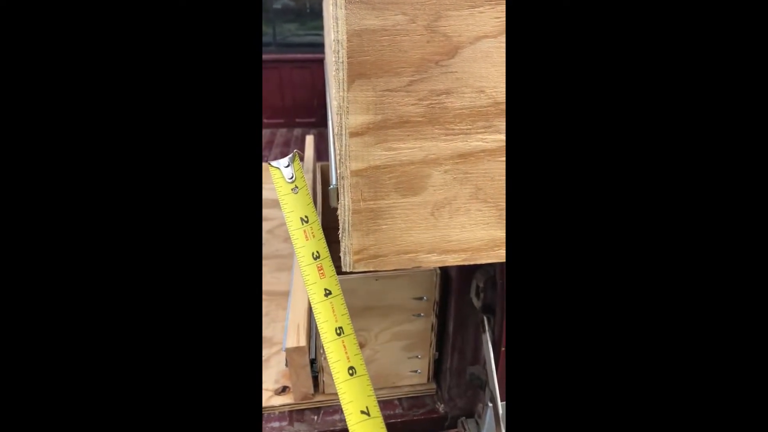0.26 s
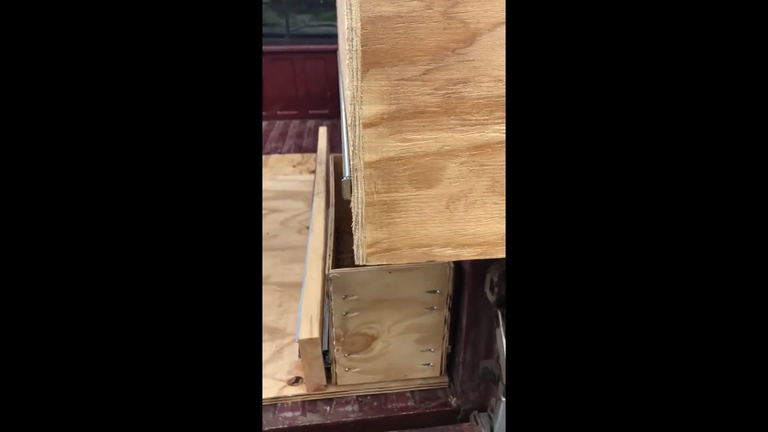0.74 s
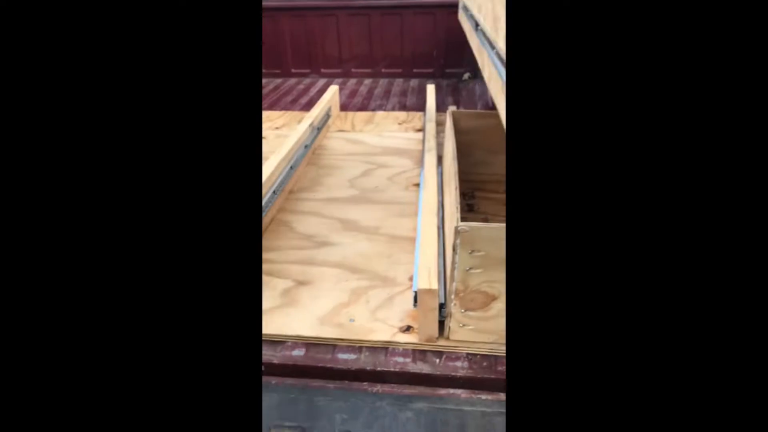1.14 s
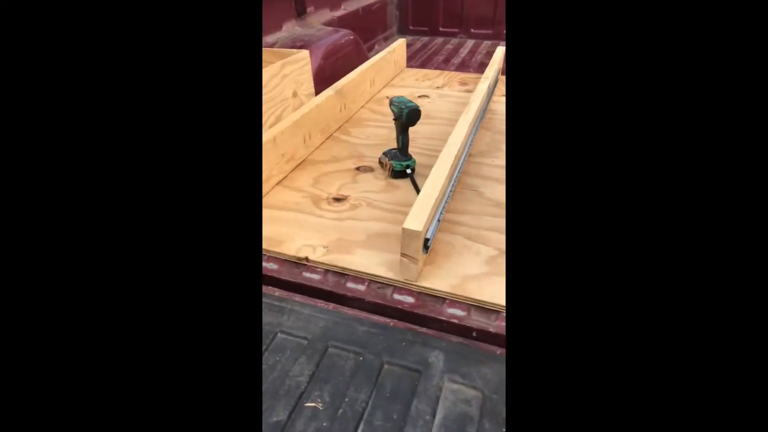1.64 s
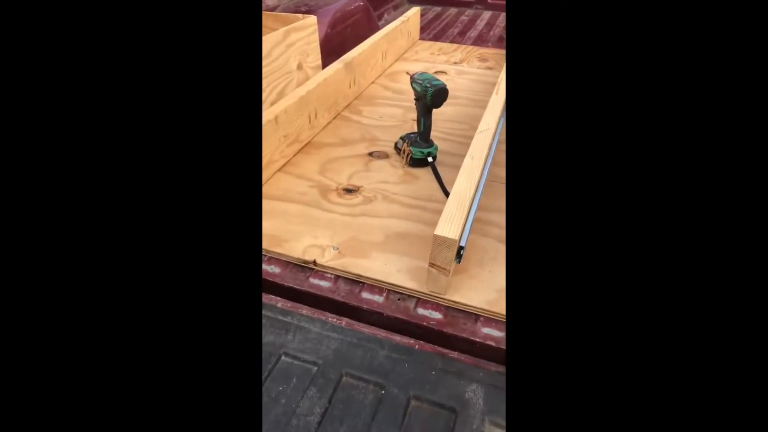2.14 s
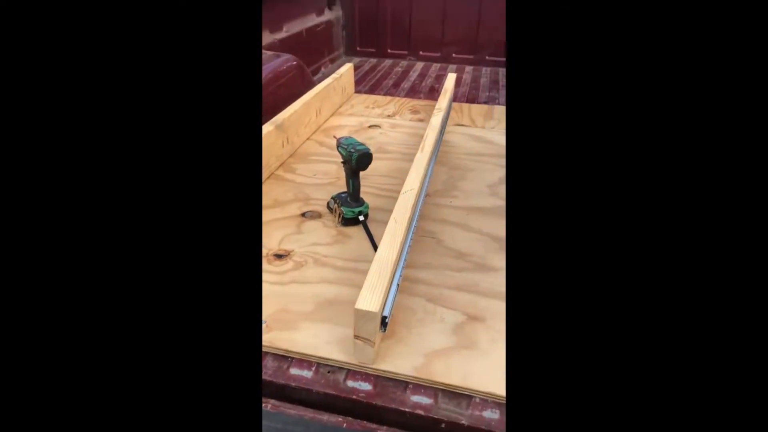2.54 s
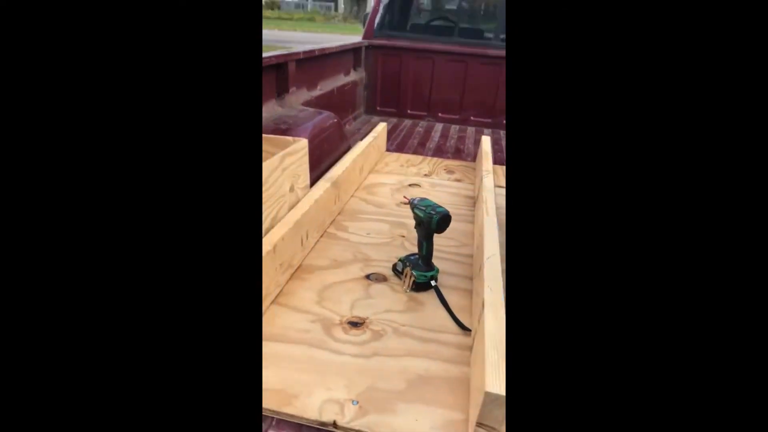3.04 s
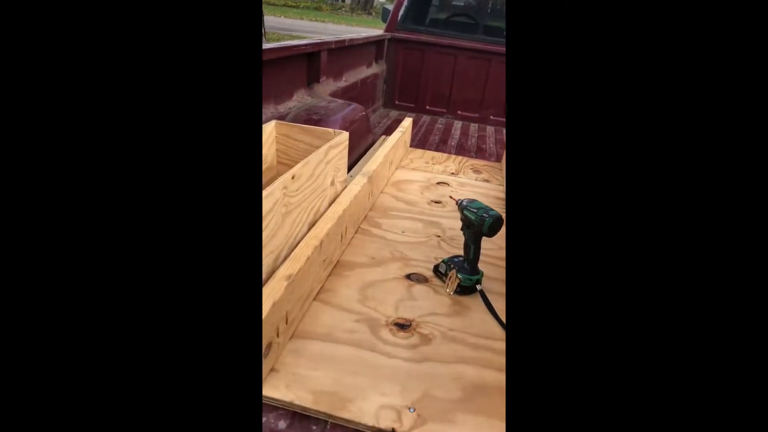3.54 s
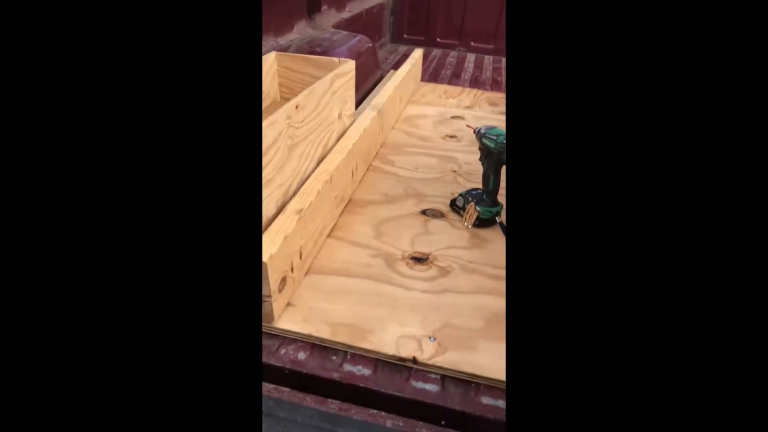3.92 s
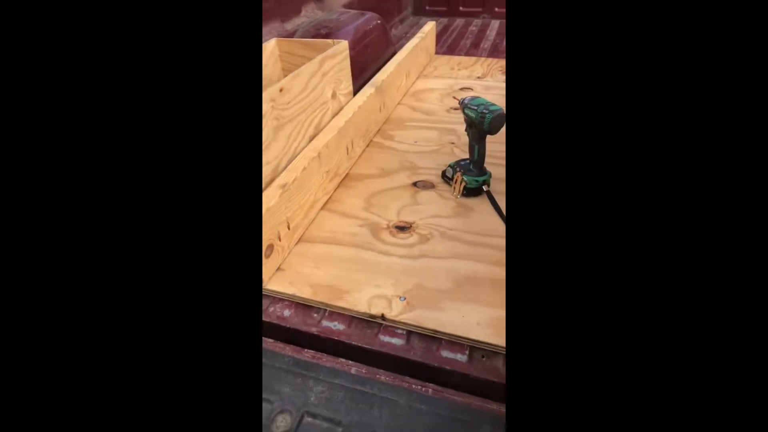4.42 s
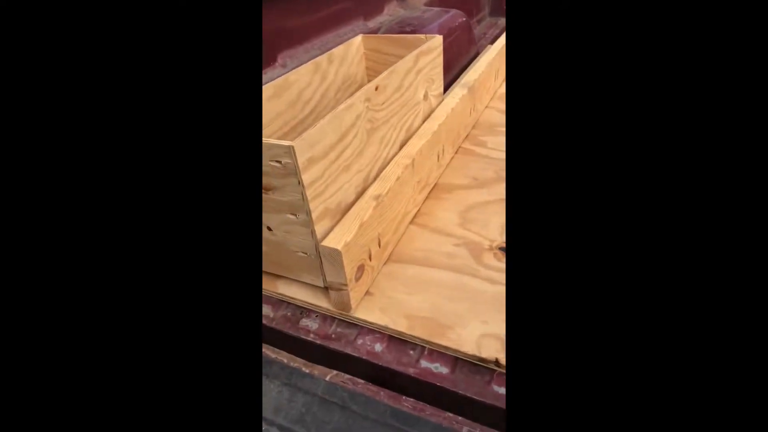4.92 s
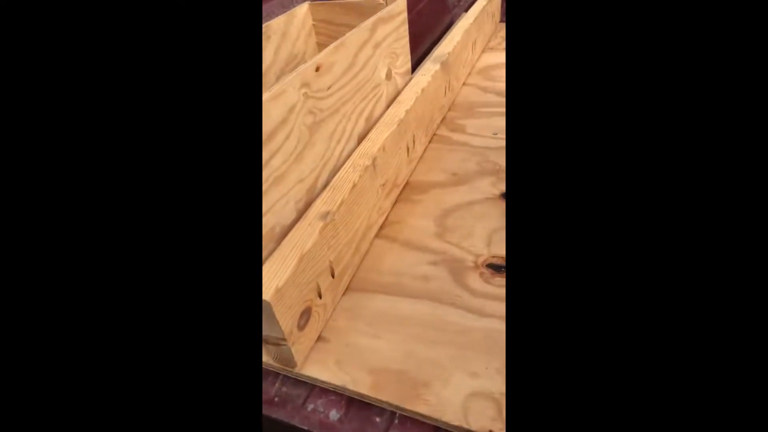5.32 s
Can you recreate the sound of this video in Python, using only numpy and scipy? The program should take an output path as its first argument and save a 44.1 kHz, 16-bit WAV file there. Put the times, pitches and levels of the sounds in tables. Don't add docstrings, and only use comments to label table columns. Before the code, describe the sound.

Close to a phone at an open truck bed, a tape measure ticks, zips into its case and snaps. A plywood drawer then drops and rattles, is dragged with scraping and low booms, and is shoved in a dense run of hard knocks. It settles quickly, leaving faint distant traffic and a few tiny nudges.

```python
import sys
import numpy as np
from scipy import signal
from scipy.fft import rfft, irfft, next_fast_len
from scipy.io import wavfile
from scipy.ndimage import uniform_filter1d, minimum_filter1d, map_coordinates

SR = 44100
rng = np.random.default_rng(int(sys.argv[2]) if len(sys.argv) > 2 else 0)


def linear_from_db(decibels):
    return 10 ** (np.asarray(decibels, float) / 20)


def generate_wav(sig):
    pcm = np.round(np.clip(np.atleast_2d(sig).T, -1, 1) * 32767).astype(np.int16)
    wavfile.write(sys.argv[1], SR, pcm)


N = 245833

# (frequency [Hz], width [Hz], level [dB])
BED = [(135.3, 13, -1), (149, 22.3, -1), (191.5, 23.3, 1.5), (246.8, 20.2, -4), (308, 27.6, -7)]
# (frequency [Hz], width [Hz], level [dB])
PLY = [(329.4, 46.6, -1.5), (442, 84, -1), (472, 106, -2), (612, 98, -8), (725, 122, -11),
       (996, 213, -10.5), (1084, 307, -13.5), (1794, 390, -26)]
# (frequency [Hz], width [Hz], level [dB])
HOLLOW = [(195, 20, -11.5), (249, 56, -16.5), (332, 62, -6.5), (355, 35, 0.5), (382.2, 38, -1),
          (430, 34, -4.5), (507, 91, -12.5), (651, 45, -16), (715, 73, -18), (957, 170, -22),
          (1158, 440, -24), (1570, 71, -20.5)]
# (start [s], end [s])
LYING = (2.6, 5.0)
# (crack treble [dB], crack centre [Hz], floor over pressure [dB], frame over pressure [dB],
# extra truck growth with pressure [dB/dB])
GESTURES = [
    (-25.5, 2200, -2.5, -11, -0.44),
    (-24.5, 1100, 14.5, 3.5, 0.16),
    (-15.5, 2500, 4.5, 1.5, -0.25),
    (-29, 3130, 6.5, 8, -0.23),
    (-31, 2100, 4.5, -7, -0.17),
]


def unit(x):
    return x / np.sqrt(np.mean(x ** 2) + 1e-20)


def along(points, hz):
    f, v = np.transpose(points)
    return np.interp(np.log(hz + 1), np.log(f + 1), v)


def gains(rows):
    s, *cols = np.transpose(rows)
    return [linear_from_db(np.interp(np.arange(N) / SR, s, c, left=-120, right=-120)) for c in cols]


def strokes(starts_s, ends_s, levels_db, rises, falls):
    grid_s = np.arange(0, N / SR + .002, .001)
    columns = (starts_s, ends_s, levels_db, rises, falls)
    start, end, db, up, down = (np.reshape(v, (-1, 1)) for v in columns)
    before_db = abs(up) * np.maximum(start - grid_s, 0)
    after_db = abs(down) * np.maximum(grid_s - end, 0)
    gain = linear_from_db(db - before_db - after_db).sum(axis=0)
    return np.interp(np.arange(N) / SR, grid_s, gain)


def wobble(rate_hz):
    knots = rng.standard_normal(int(N * rate_hz / SR) + 4)
    return map_coordinates(knots, [np.arange(N) * rate_hz / SR])


def filtered(x, response):
    m = next_fast_len(N + SR // 8)
    return irfft(rfft(x, m) * response(np.fft.rfftfreq(m, 1 / SR)), m)[:N]


def coloured(x, spectrum):
    return unit(filtered(x, lambda hz: linear_from_db(along(spectrum, hz))))


def patchy(x, depth_db):
    z = signal.stft(x, nperseg=256)[2]
    field = uniform_filter1d(rng.standard_normal(z.shape), size=4, axis=0)
    field = uniform_filter1d(field, size=8, axis=1)
    return signal.istft(z * linear_from_db(depth_db * unit(field)), nperseg=256)[1][:N]


def grit(share, spread_db):
    catches = (rng.random(N) < share) * linear_from_db(spread_db * np.minimum(rng.exponential(1, N), 3))
    return rng.standard_normal(N) * (1 + catches)


def resonance(f, centre_hz, width_hz):
    return 1j * f * width_hz / (centre_hz * centre_hz - f * f + 1j * f * width_hz)


def radiation_loss(f, top_hz):
    return 1 + 1.4j * f / top_hz - (f / top_hz) ** 2


def ring(x, modes, top_hz):
    def body(f):
        total = sum((-1) ** k * linear_from_db(db) * resonance(f, c, w) for k, (c, w, db) in enumerate(modes))
        return total / radiation_loss(f, top_hz)
    return filtered(x, body)


def bursts(times, levels_db, t60s, noise):
    out, t = np.zeros(N + SR), np.arange(noise.shape[1]) / SR
    for s, db, t60, row in zip(times, levels_db, t60s, noise):
        out[round(s * SR):][:len(t)] += linear_from_db(db - 60 * t / max(t60, .003)) * row
    return out[:N]


def cracks(times, peaks_db, treble_db, centres_hz, t60s, low_hz, knee_hz, steep, lift, sharp):
    hz = np.fft.rfftfreq(4096, 1 / SR)
    centre, treble = np.asarray(centres_hz)[:, None], np.asarray(treble_db)[:, None]
    octaves = np.log2(np.maximum(hz, knee_hz) / knee_hz)
    slope = linear_from_db((treble + 4) * steep * octaves) / np.hypot(1, (hz / 11000) ** 2)
    peak = 1 + lift / (1 + ((hz - centre) / (.1 * centre)) ** 2)
    shape = (hz / np.hypot(hz, low_hz)) ** 2 * slope * peak
    mottle = linear_from_db(1.3 * unit(uniform_filter1d(rng.standard_normal(shape.shape), size=40)))
    rows = irfft(rfft(rng.standard_normal((len(times), 4096))) * shape * mottle)
    rows = rows / rows.std(axis=1, keepdims=True)
    t = np.arange(4096) / SR
    rise_s = 0.00034 + 0.02 * np.asarray(t60s)[:, None]
    envelope = (1 - np.exp(-t / rise_s)) * (1 + sharp * np.exp(-t / 0.0036))
    return bursts(times, peaks_db, t60s, rows * envelope)


def blows(times, levels_db, contact_s, rough, chatter_s=0.039):
    u = np.arange(1024) / (contact_s * SR)
    push = u * np.exp(-u) / (contact_s * SR) + rough * rng.standard_normal((len(times), 1024))
    return bursts(times, levels_db, np.full(len(times), chatter_s), push)


def struck(times, levels_db, modes, top_hz, contact_s, rough, chatter_s, own_hz=None):
    mode_scatter_db, pitch_scatter = 1.5, .015
    n, f = np.arange(4096), np.fft.rfftfreq(4096, 1 / SR)
    u = n / (contact_s * SR)
    chance = rng.standard_normal((len(times), 2, len(modes)))
    chatter = rough * linear_from_db(-60 * n / SR / chatter_s) * rng.standard_normal((len(times), len(n)))
    push = u * np.exp(-u) / (contact_s * SR) + chatter
    body = 0
    for k, (centre_hz, width_hz, db) in enumerate(modes):
        gain = (-1) ** k * linear_from_db(db + mode_scatter_db * chance[:, :1, k])
        pitch_hz = centre_hz * (1 + pitch_scatter * chance[:, 1:, k])
        body = body + gain * resonance(f, pitch_hz, width_hz)
    if own_hz is not None:
        body = body + resonance(f, own_hz[:, None], 0.21 * own_hz[:, None])
    rows = irfft(rfft(push) * body / radiation_loss(f, top_hz))
    return bursts(times, levels_db, np.full(len(times), 10), rows)


def is_lying(t):
    return (t > LYING[0]) & (t < LYING[1])


def traffic():
    # (frequency [Hz], level [dB])
    hum_spectrum = [(13, -55), (22, -33), (43, -16.5), (60, 0.5), (81, -1), (133, -7.5), (171, -7),
                    (306, -18), (371, -22.5), (784, -21.5), (1120, -23), (2370, -34.5), (16500, -60)]
    return linear_from_db(-54 + 0.45 * wobble(0.6)) * coloured(rng.standard_normal(N), hum_spectrum)


def tape():
    # (frequency [Hz], level [dB])
    rasp_spectrum = [(180, -42.5), (300, -10), (610, -16), (1770, -7.5), (2560, -2.5), (4070, -9),
                     (6080, -6.5), (12000, -23), (15600, -61), (22000, -120)]
    hiss_spectrum = [(1180, -43), (2000, -28), (3400, -6), (5620, -2), (9050, -4), (15000, -9.5),
                     (16100, -2.5), (16500, -47.5)]
    # (frequency [Hz], width [Hz], level [dB])
    blade_modes = [(3387, 280, 3.5), (5700, 200, -1.5), (6600, 70, -8.5), (2490, 180, -14)]
    case_modes = [(192, 130, -2.5), (337, 120, 1.5), (509, 560, 2), (900, 250, -7)]
    # (time [s], peak [dB], centre [Hz], t60 [s])
    tick_events = [(0.7747, -32.5, 4140, 0.064), (0.7864, -36.5, 7140, 0.047), (0.8634, -45, 3120, 0.14),
                   (0.8704, -34, 4080, 0.097), (0.9044, -44, 3510, .065), (0.9103, -36.5, 3480, 0.092),
                   (0.9233, -33.5, 6810, 0.0255), (1.7665, -43, 7550, 0.059), (1.8844, -39, 8370, 0.025),
                   (1.913, -47, 5700, .048)]
    # (time [s], peak [dB], case level [dB], centre [Hz], t60 [s])
    unlock_events = [
        (1.2256, -35.5, -51.5, 3070, 0.078),
        (1.2448, -21, -44.5, 6500, 0.098),
        (1.256, -23.5, -44.5, 3460, 0.092),
    ]
    slap_events = [(1.4247, -24, -64.5, 5730, 0.069), (1.4533, -19.5, -37, 5900, 0.021),
                   (1.481, -20.5, -39.5, 6150, 0.03), (1.51, -24, -42.5, 2510, 0.069),
                   (1.5377, -23.5, -49.5, 3220, 0.085)]
    snap_events = [
        (1.5957, -7.5, -39, 2480, 0.022),
        (1.608, -2, -52, 3110, 0.025),
        (1.6117, -20, -25, 2550, 0.017),
        (1.623, -17.5, -39, 3470, .078),
    ]
    group_treble_db = (-10, -3.5, -33.5, -12.5)
    # (start [s], end [s], level [dB], rise [dB/s], fall [dB/s])
    hiss_strokes = [
        (1.246, 1.49, -46.5, 750, 250),
        (1.426, 1.534, -44, 301, 328.5),
        (1.846, 1.84, -52, 153, 129.5),
    ]
    rasp_strokes = [(1.25, 1.247, -48.5, 560, 230), (1.29, 1.34, -49, 300, 301),
                    (1.44, 1.66, -40.5, 450, 493), (1.66, 1.63, -58, 300, 240), (1.8, 1.84, -56.5, 300, 70)]

    tick_case_db = -62
    groups = [np.insert(tick_events, 2, tick_case_db, axis=1), unlock_events, slap_events, snap_events]
    s, peak_db, case_db, hz, t60_s = np.vstack(groups).T
    treble_db = np.repeat(group_treble_db, [len(g) for g in groups])
    rasp_gain = strokes(*np.transpose(rasp_strokes)) * linear_from_db(-4 + 2.0 * wobble(59.65))
    hiss_gain = strokes(*np.transpose(hiss_strokes)) * linear_from_db(0.5 + 2.1 * wobble(50))
    sliding = rasp_gain * coloured(patchy(grit(0.007, 1.1), 2.1), rasp_spectrum)
    sliding = sliding + hiss_gain * coloured(patchy(grit(.01, 2.5), 1.8), hiss_spectrum)
    clicks = cracks(s, peak_db - 10.5, treble_db, hz, t60_s, low_hz=0.5 * hz[:, None],
                    knee_hz=6300, steep=1.0, lift=0.66, sharp=1.4)
    steel = linear_from_db(-3.5) * ring(clicks + 0.44 * sliding, blade_modes, top_hz=12000)
    case = ring(blows(s, case_db + 35.0, .0001, 0.021), case_modes, top_hz=2500)
    return sliding + clicks + steel + case


def walls(x):
    # (frequency [Hz], t60 [s])
    wall_t60 = [(200, 0.33), (2000, 0.09), (12000, 0.056)]
    hz, t, z = signal.stft(rng.standard_normal(SR // 2), SR, nperseg=256)
    decay = linear_from_db(-60 * t / along(wall_t60, hz)[:, None])
    tail = signal.istft(z * decay, SR, nperseg=256)[1]
    return signal.fftconvolve(x, tail / np.linalg.norm(tail))[:N]


def shove():
    # (time [s], pressure [dB], grit over pressure [dB])
    drag_tables = [
        [(1.95, -54, -8), (2.01, -47, 18.5), (2.12, -36.5, -14), (2.18, -33, -10), (2.34, -37, -23),
         (2.42, -43, -12), (2.46, -40.5, -3), (2.51, -35, -16), (2.56, -53.5, -8.5)],
        [(2.73, -45.5, -6), (2.82, -36.5, -17), (2.91, -33, -4.5), (2.95, -27.5, -12.5), (3.02, -29.5, -9.5),
         (3.18, -33, -12.5), (3.3, -36, -18.5), (3.37, -37.5, -13.5), (3.46, -36, -15.5), (3.5, -37, -26),
         (3.56, -42.5, -23.5)],
        [(3.6, -48, -5), (3.66, -27, -12), (3.71, -28.5, -5.5), (3.84, -38.5, -9.5), (3.92, -23.5, -14),
         (4.02, -32.5, -9), (4.1, -22, -9.5), (4.17, -35, -6.5), (4.21, -16, -13.5)],
        [(4.28, -25.5, -10), (4.36, -39.5, -7), (4.42, -43, -8), (4.48, -49.5, -11.5), (4.56, -52.5, -13),
         (4.68, -59.5, -12), (4.8, -62, -9), (5.0, -64, -3)],
        [(5.09, -61.5, 1), (5.168, -54.5, -3.5), (5.268, -60.5, -1), (5.39, -56.5, -6), (5.45, -45, -9),
         (5.54, -51, -5.5), (5.574, -35, -5.5)],
    ]
    # (time [s], floor level [dB], frame level [dB], fall [dB/s])
    lurch_events = [(1.975, -30.5, -34.5, 199), (2.019, -25, -31, 68), (2.18, -37, -51, 43),
                    (2.46, -32.5, -40.5, 78), (2.851, -16.5, -15.5, 47), (2.95, -11.5, -19, 85),
                    (3.42, -26, -47, 144), (3.474, -14.5, -44, 165), (3.628, -5.5, -22, 132),
                    (3.786, -7.5, -15, 354), (3.869, -14, -25, 323), (3.952, -10, -29.5, 248),
                    (3.98, -31, -10, 294), (4.099, -10.5, -21, 61.5), (4.169, -16, -12.5, 303.5),
                    (4.269, -13, -40.5, 153), (4.559, -45, -38.5, 153), (4.7, -41, -46, 121),
                    (5.168, -37.5, -44.5, 125), (5.311, -39, -64, 98), (5.454, -37, -58, 152),
                    (5.565, -30, -57, 108)]
    # (frequency [Hz], width [Hz], level [dB])
    frame_modes = [(55.3, 14, 0), (75, 9.9, 5), (100, 26, 3)]
    # (frequency [Hz], level [dB])
    scrape_spectrum = [(590, -20), (1000, -4), (1660, -4), (1930, -5.5), (2170, -5), (2840, -7.5),
                       (5670, -12.5), (6380, -13), (8860, -19), (15200, -27.5), (16500, -33.5)]

    mid_pressure_db, lurch_rise = -32, 550
    drag = []
    for rows, (_, _, floor_over_db, frame_over_db, grows) in zip(drag_tables, GESTURES):
        for s, pressure_db, grit_db in rows:
            truck_db = pressure_db + grows * (pressure_db - mid_pressure_db)
            drag.append((s, pressure_db, pressure_db + grit_db,
                         truck_db + floor_over_db, truck_db + frame_over_db))
    ply_gain, scrape_gain, bed_gain, frame_gain = gains(drag)
    s, floor_db, frame_db, fall = np.transpose(lurch_events)
    bed_gain = np.hypot(bed_gain, strokes(s, s, floor_db, lurch_rise, fall))
    frame_gain = np.hypot(frame_gain, strokes(s, s, frame_db, lurch_rise, fall))

    lumps = wobble(35)
    boom = unit(ring(linear_from_db(0.54 * wobble(30)) * rng.standard_normal(N), BED, top_hz=314.4))
    deep = ring(linear_from_db(0.49 * wobble(18)) * rng.standard_normal(N), frame_modes, top_hz=126.7)
    deep = unit(filtered(deep, lambda hz: (hz / np.hypot(hz, 46)) ** 3))
    drive = linear_from_db(1.8 * lumps) * grit(0.012, 1.7)
    damped = unit(ring(drive, PLY, top_hz=1450))
    free = unit(ring(drive, HOLLOW, top_hz=900))
    wood = np.where(is_lying(np.arange(N) / SR), damped, free)
    rub = linear_from_db(2.0 * lumps + 1.0 * wobble(120)) * grit(0.025, 2.6)
    rub = coloured(patchy(rub, 1.0), scrape_spectrum)
    truck = bed_gain * linear_from_db(-4.5) * boom + frame_gain * linear_from_db(0.5) * deep
    return truck + ply_gain * wood + scrape_gain * rub


def knocks():
    # (time [s], crack peak [dB], plywood level [dB], crack t60 [s])
    rock_contacts = [(1.9592, -1, -3.5, 0.025), (1.9739, 0.5, -9.5, 0.028), (1.9852, -5, -8, 0.0073),
                     (2.0034, -21.5, -20.5, 0.088), (2.0134, -22.5, -18, 0.13), (2.0264, -22, -3, 0.019),
                     (2.0385, -17.5, -34, 0.0093), (2.0512, -16.5, -17, 0.032), (2.0854, -30, -16, 0.06),
                     (2.1343, -19, -11.5, 0.041), (2.1534, -20, -22.5, 0.084), (2.1908, -18, -18.5, 0.014),
                     (2.2049, -20.5, -15, 0.019), (2.219, -21.5, -33, 0.061), (2.2357, -46, -12.5, 0.033),
                     (2.2391, -11, -27, 0.014), (2.2611, -36, -57, .027), (2.2848, -19, -16.5, 0.016),
                     (2.305, -23.5, -24, 0.046), (2.3272, -19, -27.5, 0.019), (2.357, -24.5, -23, 0.034),
                     (2.384, -30, -42, 0.018), (2.4167, -59.5, -34, .05), (2.443, -17.5, -10.5, 0.11),
                     (2.4588, -22, -26, 0.072)]
    slide_contacts = [(2.7614, -32, -21, 0.086), (2.8112, -21.5, -18, 0.19), (2.8248, -41, -13.5, 0.056),
                      (2.857, -14.5, -11, 0.15), (2.8651, -19.5, -15, 0.12), (2.9324, -31, -10, 0.12),
                      (2.969, -22, -25, 0.17), (3.1348, -29, -14.5, 0.23), (3.237, -44, -39, 0.055),
                      (3.296, -58, -41, .05), (3.4488, -39, -37, 0.1), (3.4682, -60, -22, .05)]
    shove_contacts = [(3.5975, -1, 0.5, 0.028), (3.618, -20.5, -16, 0.14), (3.639, -19.5, -26, 0.13),
                      (3.661, -20.5, -26, 0.074), (3.69, -15.5, -26, 0.0235), (3.707, -23, -8, 0.097),
                      (3.7279, -15.5, -12, 0.021), (3.7661, -20, -15.5, 0.036), (3.78, -16.5, -22.5, 0.085),
                      (3.825, -27.5, -30, 0.052), (3.861, -26, -25, 0.046), (3.898, -25.5, -16, 0.046),
                      (3.919, -13, -32, 0.054), (3.9315, -13, -21, 0.26), (3.9426, -11, -9.5, .038),
                      (3.9837, -13.5, -17, 0.03), (3.9999, -12.5, -28, 0.0727), (4.045, -16, -38, 0.032),
                      (4.0583, -13.5, 0.5, 0.074), (4.1294, -25.5, -10.5, 0.043),
                      (4.177, -16.5, -24, 0.022), (4.1938, 3, -3.5, 0.018), (4.212, -15.5, -4.5, 0.048),
                      (4.2209, -20.5, -6.5, 0.06), (4.2645, -14, -12.5, .058), (4.2938, -20, -15, .08),
                      (4.3181, -22, -14, 0.024), (4.346, -22.5, -21.5, 0.032), (4.361, -26.5, -31, 0.075),
                      (4.3988, -31.5, -29, 0.049)]
    settle_contacts = [(4.6137, -50, -63, 0.043), (4.7063, -51.5, -59.5, .04), (4.7397, -47, -62, 0.017),
                       (4.827, -55.5, -54.5, 0.086), (4.891, -56, -58, .05)]
    nudge_contacts = [(5.149, -52, -38, .05), (5.295, -46, -52, .05), (5.4168, -38, -25.5, .06),
                      (5.44, -51, -34.5, .05), (5.465, -47, -43, 0.072), (5.549, -33.5, -38.5, 0.061)]

    dulling = .15
    treble_scatter_db, centre_scatter = -2.5, 0.2
    groups = [rock_contacts, slide_contacts, shove_contacts, settle_contacts, nudge_contacts]
    s, crack_db, ply_db, t60_s = np.vstack(groups).T
    treble_db, hz = np.repeat(GESTURES, [len(g) for g in groups], axis=0).T[:2]
    chance = rng.standard_normal((len(s), 2))
    treble_db = treble_db - dulling * np.clip(ply_db - crack_db, -15, 15)
    treble_db = treble_db + treble_scatter_db * chance[:, 0]
    hz = hz * np.exp(centre_scatter * chance[:, 1])
    lying = is_lying(s)
    crack = cracks(s, crack_db - 14.5, treble_db, hz, t60_s, low_hz=np.where(lying, 890, 1700)[:, None],
                   knee_hz=2410, steep=0.43, lift=0.16, sharp=2.39)
    free = struck(s[~lying], ply_db[~lying] + 49, HOLLOW, top_hz=2220,
                  contact_s=.00015, rough=.012, chatter_s=.028)
    damped = struck(s[lying], ply_db[lying] + 40, PLY, top_hz=2580,
                    contact_s=.00009, rough=0.047, chatter_s=0.062)
    boom = ring(blows(s[lying], ply_db[lying] + 45.0, 0.00043, 0.06), BED, top_hz=440)
    return crack + free + damped + boom


def raps():
    # (time [s], peak [dB], strongest frequency [Hz])
    board_raps = [(2.764, -20, 630), (2.815, -7.5, 705), (2.855, -10, 880), (2.865, -6, 1750),
                  (2.877, -12, 958), (2.935, -11.5, 1030), (2.947, -7, 484), (2.992, -16, 696),
                  (3.135, -24, 490), (3.159, -13, 755), (3.359, -30, 480), (3.405, -24, 458),
                  (3.599, -11, 452), (3.706, -14.5, 600), (3.896, -12.5, 950), (4.059, -2.5, 526),
                  (4.067, -19, 497), (4.13, -15, 590), (4.195, -11, 443), (4.212, 1, 452), (4.242, -9, 457),
                  (4.296, -20, 550), (5.418, -27, 458),
                  (1.9597, -5, 561), (1.9745, -5, 1160), (1.987, -3, 620), (2.015, -11, 1000),
                   (2.045, -19, 660), (2.135, -30, 510), (2.4435, -15, 470), (5.149, -38, 600),
                   (5.43, -50, 430), (5.462, -36, 430)]
    # (frequency [Hz], width [Hz], level [dB])
    board_modes = [(740, 150, -2), (880, 34, -5.5), (1038, 92, -1), (1285, 99, -9.5), (1735, 130, -14.5),
                   (2190, 200, -15)]
    # (time [s], peak [dB], centre [Hz])
    rattle_events = [(2.105, -32, 3500), (2.146, -22, 6000), (2.158, -22, 4580), (2.166, -32, 6080),
                     (2.181, -30, 4500), (2.249, -30, 4500), (2.259, -22, 6000), (2.268, -25, 3580),
                     (2.301, -24, 4800), (2.342, -30, 6400), (2.348, -26, 4000), (2.379, -30, 3500),
                     (2.390, -41, 4970), (2.417, -35, 3000), (2.449, -28, 4500), (2.457, -25, 5500),
                     (2.475, -33, 3950), (3.720, -16, 3800), (3.798, -29, 3600), (3.842, -27.5, 7000),
                     (3.880, -38, 3750), (3.960, -30, 5000), (4.012, -20, 4000), (4.110, -17, 5000),
                     (4.143, -21, 3810), (4.235, -26.5, 2830), (4.371, -21, 3570), (4.7396, -48, 5100)]

    s, db, hz = np.array(board_raps).T
    boards = struck(s, db + 24, board_modes, top_hz=3500, contact_s=.00006, rough=0.043,
                    chatter_s=0.05, own_hz=hz)
    s, db, hz = np.transpose(rattle_events)
    treble_db, t60_s = np.full(len(s), -20.), np.full(len(s), 0.015)
    rattle = cracks(s, db - 13.5, treble_db, hz, t60_s, low_hz=2360, knee_hz=6000,
                    steep=.9, lift=1.5, sharp=2.2)
    return boards + rattle


def pings():
    # (time [s], level [dB], frequency [Hz])
    ping_events = [(2.2399, -16.5, 2720), (2.286, -26, 6500), (2.2872, -23.5, 3800), (4.1967, -10.5, 2640),
                   (4.346, -27.5, 1550), (4.359, -28, 1570), (4.374, -33.5, 1540), (4.39, -39, 1550),
                   (3.829, -28.5, 3690), (3.661, -25.5, 3810), (4.7077, -57.5, 3750), (4.7395, -43, 3800)]
    s, db, hz = np.transpose(ping_events)
    notes = np.sin(2 * np.pi * hz[:, None] * np.arange(SR // 10) / SR)
    t60_s = np.full(len(s), 0.014)
    return bursts(s, db, t60_s, notes)


def scene():
    near = tape() + knocks() + raps() + pings()
    return (near + linear_from_db(-8.0) * walls(near) + shove() + traffic())[None]


def roll_off(x):
    return signal.sosfilt(signal.butter(12, 16810, fs=SR, output="sos"), x)


def record(dry):
    ceiling, top_hz = .7, 16000
    heard = filtered(dry[0], lambda hz: (1j * hz / (1j * hz + 27)) ** 3)
    need = np.minimum(1, ceiling / (np.abs(heard) + 1e-9))
    gain = uniform_filter1d(minimum_filter1d(need, size=129), size=65)
    mix = filtered(heard * gain, lambda hz: hz < top_hz)[None]
    return roll_off(mix)


dry = scene()
out = record(dry)
generate_wav(out)
```